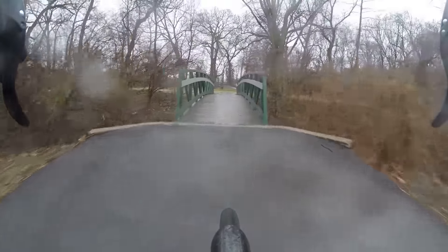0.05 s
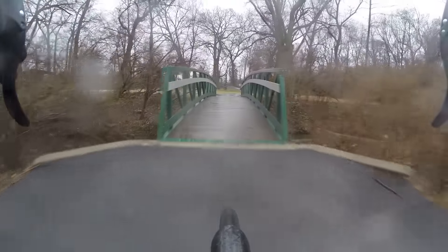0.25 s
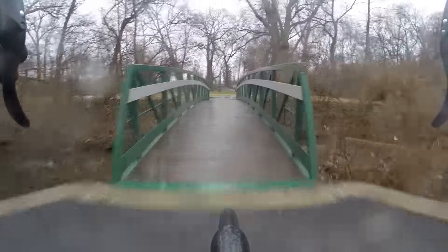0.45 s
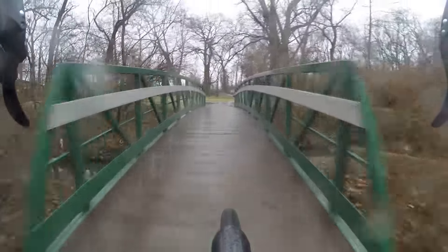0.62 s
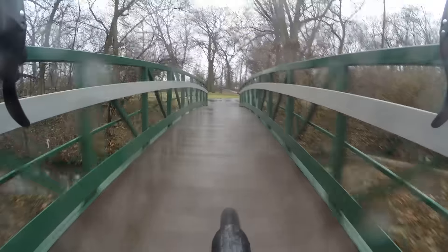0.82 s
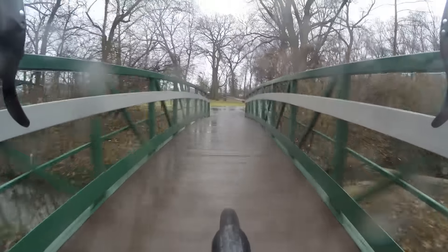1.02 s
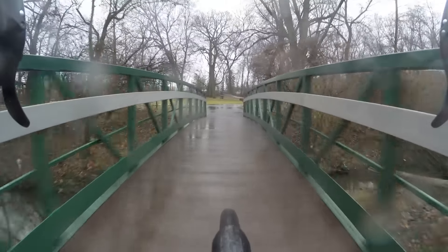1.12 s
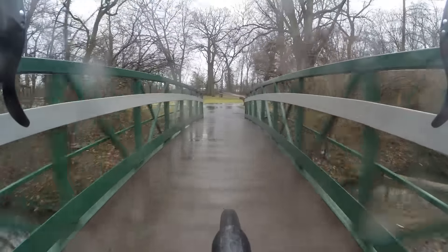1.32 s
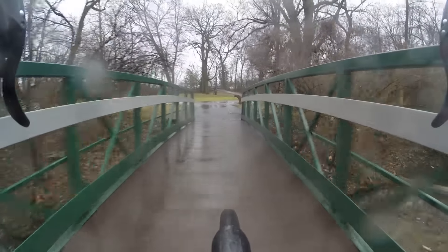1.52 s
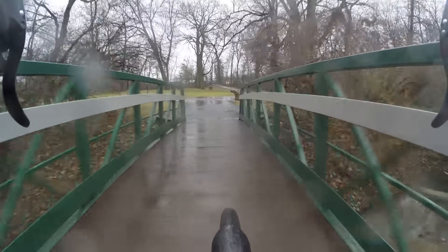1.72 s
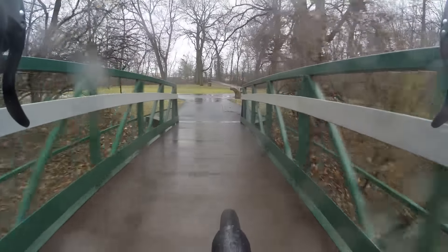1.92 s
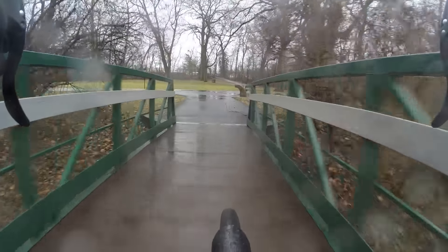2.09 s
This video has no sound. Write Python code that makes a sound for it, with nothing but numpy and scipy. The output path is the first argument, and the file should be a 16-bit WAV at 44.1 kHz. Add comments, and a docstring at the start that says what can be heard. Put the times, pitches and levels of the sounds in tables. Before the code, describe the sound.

A bicycle coasts on wet asphalt, its freewheel ticking fast while the tyres hum and spray. Both wheels thump onto a wooden footbridge, then boards knock and the frame rattles as wind rumbles on the handlebar microphone.

```python
"""Coasting onto a footbridge

A bicycle coasts along wet asphalt and bumps onto a wooden footbridge, heard from its handlebar.
The freewheel ticks; the tyres hum, spray water and shake the frame. Both wheels strike the edge of the
deck, then boards knock under them while the handlebar shudders and wind rumbles on the microphone."""
import sys
import numpy as np
from scipy import signal
from scipy.fft import rfft, irfft
from scipy.io import wavfile
from scipy.ndimage import uniform_filter1d

SR = 44100
rng = np.random.default_rng(int(sys.argv[2]) if len(sys.argv) > 2 else 0)


def master_out(mix):
    """Clip the mix to full scale and print it as 16-bit PCM to the path in sys.argv[1]."""
    frames = np.transpose(np.atleast_2d(mix))
    ceiling = np.clip(frames, -1, 1)
    pcm = np.round(ceiling * 32767).astype(np.int16)
    wavfile.write(sys.argv[1], SR, pcm)


N = 94815

# freewheel faders; the spray rides the first too: t/s, snap level/dB, ring level/dB
FREEWHEEL_LEVEL = [(0, -38.5, -47), (.05, -41.5, -43.5), (.4, -42, -43.5), (.72, -41.5, -45.5),
                   (.84, -45.5, -55), (.93, -43.5, -53), (1.0, -45, -56), (1.1, -50, -54),
                   (1.22, -51.5, -58), (1.4, -46.5, -53.5), (1.6, -45.5, -54), (1.8, -43.5, -51),
                   (2.0, -42, -48.5), (2.15, -43, -49)]


def undb(db):
    """Decibels to gain."""
    return 10 ** (np.asarray(db) / 20)


def unit(x):
    """Scale to an rms of one."""
    return x / np.sqrt(np.mean(x ** 2) + 1e-20)


def curve(table, axis=1):
    """One column of a time table, joined by straight lines."""
    rows = np.array(table)
    return np.interp(np.arange(N) / SR, rows[:, 0], rows[:, axis])


def colour(x, points):
    """EQ through (f/Hz, level/dB) points; rms one."""
    hz, db = np.array(points).T
    f = np.maximum(np.arange(N // 2 + 1) * SR / N, 1)
    gain = undb(np.interp(np.log(f), np.log(hz), db))
    return unit(irfft(rfft(x) * gain, N))


def noise(points):
    """Coloured noise."""
    return colour(rng.standard_normal(N), points)


def resonance(hz, width):
    """A resonance kept ringing by random pushes, with steep skirts."""
    f = np.maximum(np.arange(N // 2 + 1) * SR / N, 1)
    detune = (f / hz - hz / f) * hz / width
    return unit(irfft(rfft(rng.standard_normal(N)) / (1 + 1j * detune) / (1 + .3j * detune), N))


def even(x, span_s):
    """Level out the slow swells of a random vibration."""
    return x / np.sqrt(uniform_filter1d(x ** 2, max(int(span_s * SR), 2)) + 1e-9)


def burst(age, rise_s, decay_s):
    """A smooth attack and an exponential release."""
    age = np.maximum(age, 0)
    return (1 - np.exp(-(age / rise_s) ** 2)) * np.exp(-age / decay_s)


def drift(rate_hz):
    """Smooth random modulation; rms one."""
    step = int(SR / rate_hz)
    stairs = np.repeat(rng.standard_normal(N // step + 1), step)
    return unit(uniform_filter1d(stairs, step)[:N])


def on_deck():
    """Crossfade from zero on the asphalt to one on the boards."""
    middle_s, crossing_s = 0.74, 0.16
    return np.clip((np.arange(N) / SR - middle_s) / crossing_s + .5, 0, 1)


def freewheel():
    """The pawls snap off each ratchet tooth; the hub rings and sizzles just after them."""
    # tick rate, swinging as the bike pitches: t/s, rate/Hz
    tick_rate = [(0.0, 74.6), (0.2, 83.1), (0.33, 71.7), (0.45, 77.5), (0.58, 84.0), (0.68, 76.1),
                 (0.78, 58.9), (0.86, 64.6), (0.98, 87.1), (1.05, 86.1), (1.13, 56.2), (1.21, 51.2),
                 (1.34, 76.1), (1.42, 69.9), (1.55, 54.7), (1.7, 66.9), (1.92, 57.0), (2.15, 69.5)]
    # EQ of the snap and of the high ring: f/Hz, level/dB
    snap_eq = [(700, -56), (1300, 1.5), (1700, -0.5), (2150, -0.5), (2600, 8.5), (3100, -4.5), (3800, -1),
               (4700, -2), (5400, -7.5), (6200, -11.5), (7300, -13.5), (9000, -11), (15000, -46)]
    ring_eq = [(5000, -18), (7500, -9), (9400, -9), (10300, -1), (11200, -2.5), (12000, -6), (13000, -3),
               (14000, -12), (15000, -17), (16000, -30)]
    # hub and spoke resonances: f/Hz, level/dB
    hub_modes = [(1760, 4), (2034, 6), (2219, -12.5), (2600, 5), (2738, -11.5), (3283, -1.5), (3413, 0),
                 (3638, 6), (3812, 3), (4156, 0.5), (4588, -1.5), (5640, 0), (6165, -8.5), (6362, 3)]
    # fader of the hub's sizzle: t/s, level/dB
    sizzle_level = [(0, -50), (.14, -55), (.65, -59.5), (.8, -62), (.93, -45), (1.02, -78), (1.2, -51.5),
                    (1.3, -59), (1.5, -51), (1.75, -53), (1.82, -47), (1.94, -40.5), (1.97, -54),
                    (2.15, -53)]
    jitter_s, ring_lag_s, second_pawl_lag_s = 0.00078, 0.00094, 0.0042
    t, deck = np.arange(N) / SR, on_deck()
    teeth = .56 + np.cumsum(curve(tick_rate)) / SR
    times = np.interp(np.arange(1, int(teeth[-1]) + 1), teeth, t)
    unrest = np.interp(times, t, deck)  # the ticks grow uneven on the boards
    times = times + jitter_s * unrest * rng.standard_normal(len(times))

    def ticks(lag_s, rise_s, decay_s, scatter_db):
        """An envelope with one short swell for every tooth."""
        power = np.zeros(N)
        sizes = undb((scatter_db + 0.34 * unrest) * rng.standard_normal(len(times)))
        for at, size in zip(times + lag_s, sizes):
            part = slice(max(int(at * SR), 0), int((at + .03) * SR))
            power[part] += (size * burst(t[part] - at, rise_s, decay_s)) ** 2
        return unit(np.sqrt(power))

    hub = unit(sum(undb(db) * resonance(hz, width=78) for hz, db in hub_modes))
    snap = ticks(0, rise_s=0.00031, decay_s=0.0062, scatter_db=1)
    snap *= unit(noise(snap_eq) + undb(-6) * hub)
    first, second = (ticks(ring_lag_s + lag, rise_s=0.0033, decay_s=0.00099, scatter_db=-2)
                     for lag in (0, second_pawl_lag_s))
    ring = unit(np.hypot(first, undb(4.5) * deck * second)) * noise(ring_eq)  # doubles on the boards
    sizzle = ticks(ring_lag_s, rise_s=0.0013, decay_s=0.0067, scatter_db=5.5)
    sizzle *= resonance(hz=10100, width=470)
    return (snap * undb(curve(FREEWHEEL_LEVEL) + 0.5)
            + ring * undb(curve(FREEWHEEL_LEVEL, axis=2) - 3)
            + sizzle * undb(curve(sizzle_level) - 3.5))


def spray():
    """Wet tyres hiss and fling droplets, swelling and sinking with the freewheel's snap."""
    # EQ of the flung water: f/Hz, level/dB
    water_eq = [(500, -21.5), (1000, -6.5), (1600, -11), (3500, -7), (5000, -15.5), (8000, -22),
                (12000, -24), (16000, -44)]
    drops_per_s = 740
    drops = (rng.random(N) < drops_per_s / SR) * rng.standard_normal(N)
    drops *= undb(1.9 * rng.exponential(size=N))  # a few stand out
    hiss = undb(-1) * noise(water_eq)
    patter = undb(-7.5) * colour(drops, water_eq)
    return undb(curve(FREEWHEEL_LEVEL)) * (hiss + patter)


def tread():
    """The tread hums on asphalt and the frame's lowest tube drones; both waver and die on the boards."""
    # tread hum: t/s, f/Hz, level/dB
    hum = [(0, 357.6, -40), (.08, 363.9, -43), (.13, 362.3, -30), (.22, 364, -33.5), (.29, 353.8, -34),
           (.4, 358.5, -39.5), (.47, 354.2, -34.5), (.52, 356.7, -30.5), (.56, 364, -39), (.6, 370, -31.5),
           (.68, 370.5, -36.5), (.76, 360, -56)]
    hum_waver_hz, drone_hz, drone_waver_hz, flutter_db = 9.4, 220.2, 7.3, 3
    phase = 2 * np.pi * np.cumsum(curve(hum) + hum_waver_hz * drift(50.3)) / SR
    fundamental = np.sin(phase) * undb(flutter_db * drift(39.1))
    octave = np.sin(2 * phase) * undb(-9 + flutter_db * drift(42.3))
    tone = (fundamental + octave) * undb(curve(hum, axis=2))
    drone_phase = 2 * np.pi * np.cumsum(drone_hz + drone_waver_hz * drift(29.5)) / SR
    drone = np.sin(drone_phase) * undb(-38 + flutter_db * drift(30.8))
    return np.sqrt(2) * (tone + drone) * (1 - on_deck())


def frame():
    """The ground's texture keeps the frame ringing; its tone shifts from asphalt to boards."""
    # frame resonances: f/Hz, width/Hz, level on asphalt/dB, level on the deck/dB
    low_modes = [(95.1, 38.6, 0, 2), (127.3, 25, -6.5, -3.5), (219.1, 22.2, 0.5, -4),
                 (203.6, 41, -8.5, -9.5), (272, 56, -34, -9.5)]
    mid_modes = [(376, 92, -5.5, -3.5), (401, 140, -3.5, -1.5), (463, 76, -9, -8.5), (511.4, 26, -3, -1.5),
                 (741.4, 97, -1.5, -5.5), (827, 180, -8.5, -5), (1075, 126, -9, -15)]
    # how hard the ground shakes the bike: t/s, low level/dB, mid level/dB
    shake = [(0, -29, -32), (.1, -29.5, -32.5), (.45, -27, -33.5), (.58, -27, -31), (.68, -23.5, -32.5),
             (.76, -26, -24.5), (.81, -14.5, -28), (.86, -25.5, -35), (.93, -17, -30), (.98, -16, -27.5),
             (1.08, -23.5, -36), (1.3, -31, -36.5), (1.44, -26, -37.5), (1.53, -24, -33), (1.64, -24, -35),
             (1.74, -20.5, -32.5), (1.82, -17, -33), (1.92, -23, -36), (1.98, -17, -35.5),
             (2.05, -13.5, -35.5), (2.1, -20, -34), (2.15, -27.5, -35.5)]
    deck = on_deck()

    def band(modes):
        """A bank of resonances held at a steady level."""
        ringing = sum(resonance(hz, width) * undb(road_db + deck * (deck_db - road_db))
                      for hz, width, road_db, deck_db in modes)
        return even(ringing, span_s=0.11)

    lows = band(low_modes) * undb(curve(shake) - 2)
    mids = band(mid_modes) * undb(curve(shake, axis=2) - 1.5)
    return lows + mids


def rumble():
    """Wind buffets the microphone, and on the boards the handlebar shudders."""
    # EQ of the wind: f/Hz, level/dB
    wind_eq = [(10, -24), (25, 3.5), (45, 5.5), (70, -1.5), (120, -11), (250, -19), (600, -69),
               (16000, -130)]
    # fader for wind and shudder together: t/s, level/dB
    rumble_level = [(0, -30.5), (.27, -43), (.48, -35.5), (.56, -30), (.68, -36), (.745, -17), (.82, -20),
                    (.87, -24.5), (.92, -15), (1.0, -20.5), (1.06, -18.5), (1.13, -22), (1.2, -28),
                    (1.32, -25), (1.37, -15), (1.47, -25.5), (1.52, -15.5), (1.6, -15), (1.72, -21.5),
                    (1.85, -10), (1.91, -25), (1.98, -11), (2.08, -21.5), (2.15, -13.5)]
    shudder = even(resonance(hz=43.35, width=13.7), span_s=0.073) * undb(0.5) * on_deck()
    wind = noise(wind_eq) * undb(-8.5)
    return even(shudder + wind, span_s=0.0544) * undb(curve(rumble_level) + 1.5)


def blows():
    """Each blow thuds and rings in the frame, knocks and cracks on the boards and rattles loose metal."""
    # hits from the deck's edge and boards:
    # t/s, thud/dB, tube ring/dB, tube f/Hz, knock/dB, knock f/Hz, crack/dB, rattle/dB
    hits = [(0.627, -19, -18, 241, -33, 549, -48, -41), (0.696, -15, -33, 220, -27, 474, -44, -46),
            (.733, -11.5, -35, 212, -18.5, 733, -29.5, -46), (0.762, -18, -47, 226, -6.5, 491, -39, -25),
            (.765, -32, -29, 223, -12.5, 675, -44, -32), (.782, -1.5, -35, 214, -34, 480, -33, -32),
            (0.825, -21, -31, 222, -48, 540, -44, -35), (0.934, -14.5, -40, 216, -33, 486, -34, -26.5),
            (.950, -43, -33, 254, -11.5, 508, -44, -43), (0.966, -2.5, -23, 240, -14, 479, -26, -37),
            (0.985, -16, -6, 219.5, -14.5, 477, -26, -39), (.989, -35, -38, 218, -13.5, 666, -38, -48),
            (1.450, -30, -26.5, 313, -14, 558, -28, -34.5), (1.510, -26, -38, 220, -25, 510, -34, -56),
            (1.733, -26, -18, 278, -16.5, 376, -42, -50), (1.766, -16.5, -25, 225, -21, 554, -36, -39),
            (1.962, -15, -43, 228, -25, 500, -30, -28.5), (2.028, -14, -20, 263.4, -9, 356, -23.5, -45)]
    # the frame's thud: f/Hz, level/dB, t60/s
    thud_modes = [(95, 2, 0.091), (135, 1, 0.023), (204, -17, 0.035)]
    # a board's knock: multiple of its pitch, level/dB, t60/s
    knock_modes = [(1, -0.5, 0.054), (1.18, -15, 0.12), (1.42, -13.5, 0.056), (1.9, -17, 0.028),
                   (2.5, -21, 0.011)]
    # EQ of the wooden crack and of the metal rattle: f/Hz, level/dB
    crack_eq = [(400, -2), (1000, 6.5), (1500, -1.5), (2100, -3.5), (3500, -10.5), (7000, -17.5),
                (15000, -34)]
    rattle_eq = [(1500, -25), (2600, -8), (3300, 8), (4900, 5.5), (5800, -6), (7500, -11), (10000, -25),
                 (15000, -38)]
    rise_s = 0.0012
    t, out = np.arange(N) / SR, np.zeros(N)
    crack, rattle = noise(crack_eq), noise(rattle_eq)
    for at, thud_db, tube_db, tube_hz, knock_db, knock_hz, crack_db, rattle_db in hits:
        part = slice(int(at * SR), int((at + .3) * SR))
        age = np.maximum(t[part] - at, 0)
        for modes, scale, strength_db in ((thud_modes, 1, thud_db), (knock_modes, knock_hz, knock_db)):
            for f, db, t60 in modes:
                envelope = burst(age, rise_s, t60 / np.log(1000))
                out[part] += undb(strength_db + db) * np.sin(2 * np.pi * f * scale * age) * envelope
        tube = np.sin(2 * np.pi * tube_hz * age)
        out[part] += undb(tube_db) * tube * burst(age, rise_s, decay_s=0.024)
        out[part] += undb(crack_db) * crack[part] * burst(age, rise_s, decay_s=0.0081)
        out[part] += undb(rattle_db) * rattle[part] * burst(age, rise_s, decay_s=0.0062)
    return out


def jolts():
    """A hard bump sets the handlebar swinging for a few cycles."""
    # the wheels drop onto the deck: t/s, level/dB
    bumps = [(0.751, 0), (0.9, -13), (1.964, -6.5)]
    swing_hz = 38
    t, out = np.arange(N) / SR, np.zeros(N)
    for at, db in bumps:
        swing = np.sin(2 * np.pi * swing_hz * (t - at))
        out += undb(db) * swing * burst(t - at, rise_s=0.0022, decay_s=0.033)
    return out


def scene():
    """The mono mix at the handlebar."""
    rolling = frame()
    return (freewheel() + spray() + tread() + rolling + rumble() + jolts() + blows())[None]


def record(dry):
    """Soft-clip the highest peaks, fade both ends and cut the top."""
    fade_s, top_hz = .004, 15500
    rounded = dry / (1 + dry ** 6) ** (1 / 6)
    edge = np.minimum(np.arange(N), np.arange(N)[::-1]) / (fade_s * SR)
    lowpass = signal.ellip(8, .2, 70, top_hz, fs=SR, output="sos")
    return signal.sosfilt(lowpass, rounded * np.minimum(edge, 1))


dry = scene()
out = record(dry)
master_out(out)
```